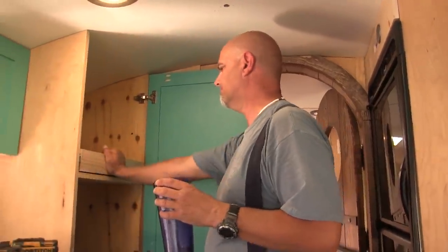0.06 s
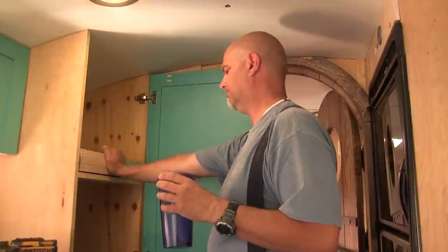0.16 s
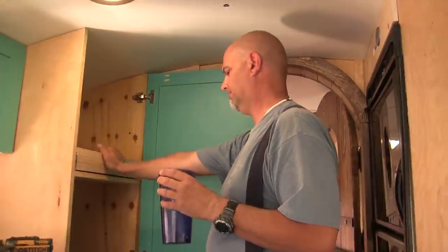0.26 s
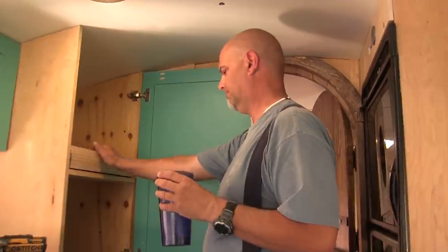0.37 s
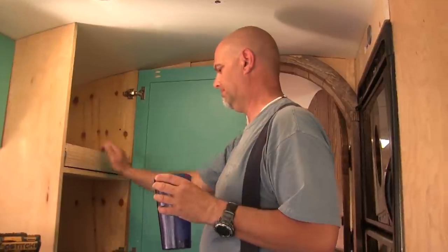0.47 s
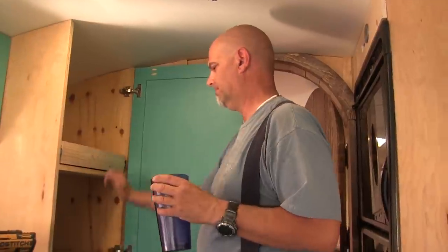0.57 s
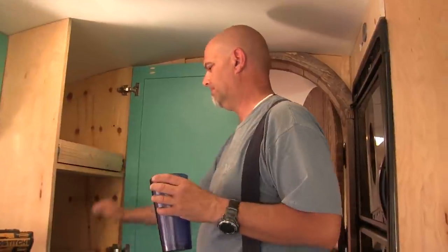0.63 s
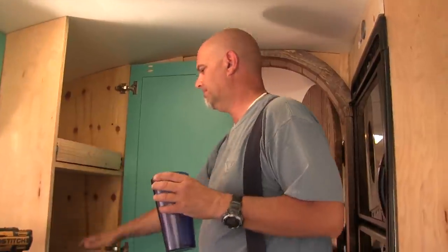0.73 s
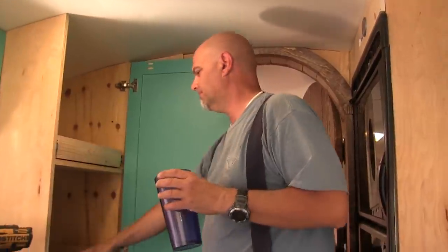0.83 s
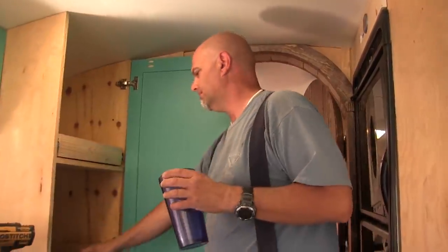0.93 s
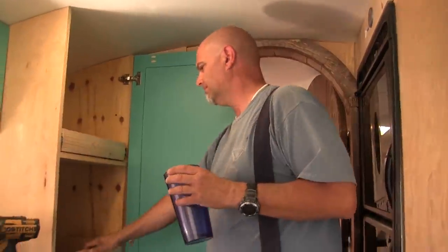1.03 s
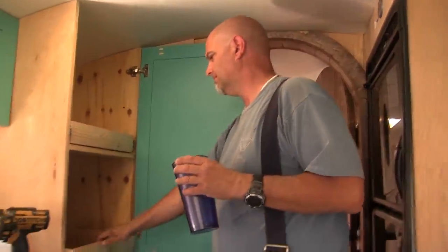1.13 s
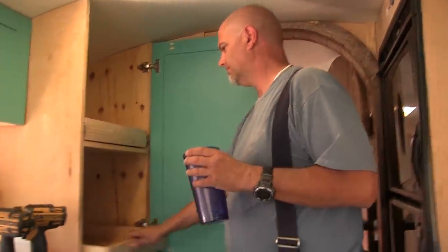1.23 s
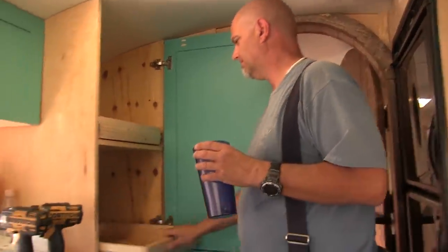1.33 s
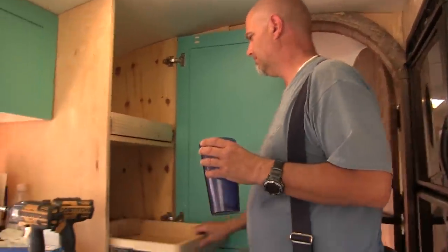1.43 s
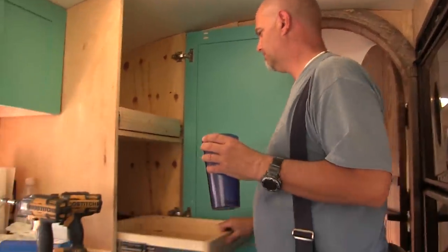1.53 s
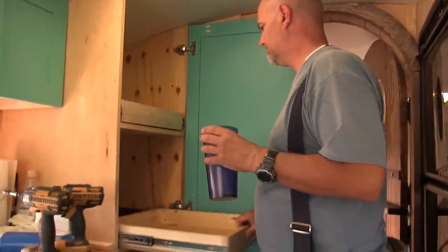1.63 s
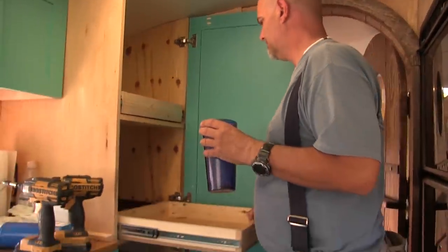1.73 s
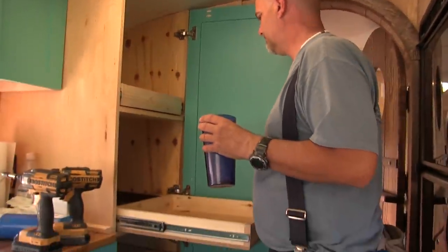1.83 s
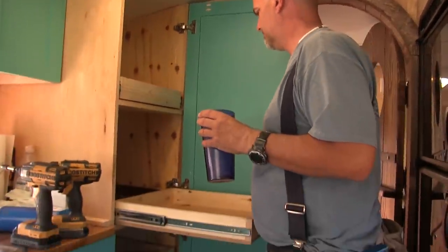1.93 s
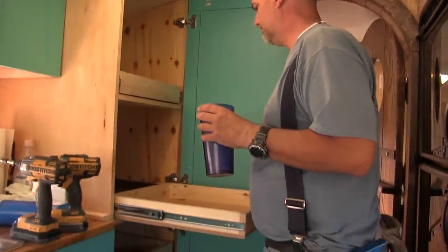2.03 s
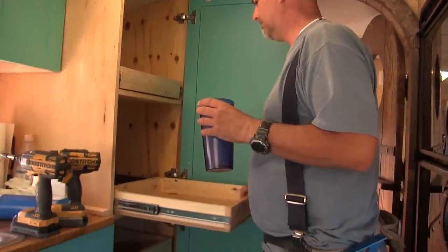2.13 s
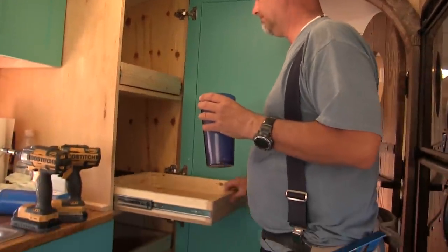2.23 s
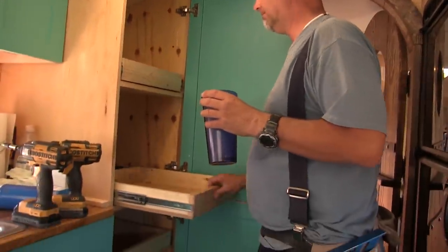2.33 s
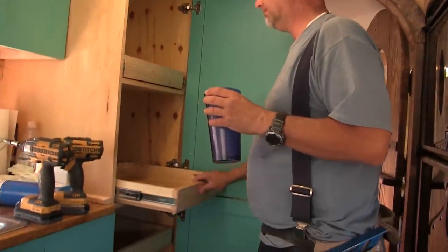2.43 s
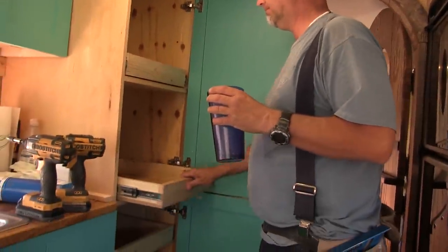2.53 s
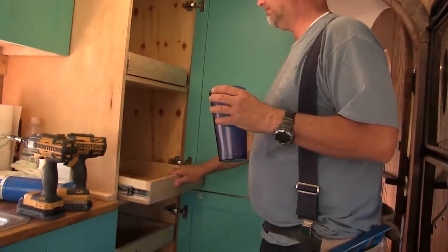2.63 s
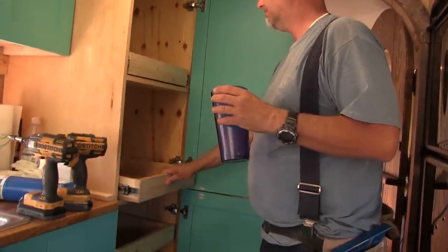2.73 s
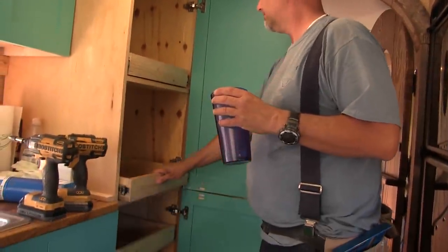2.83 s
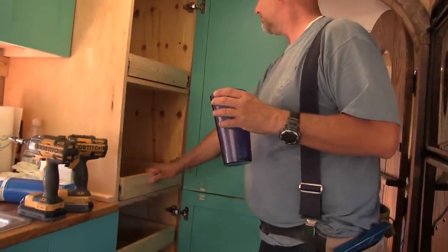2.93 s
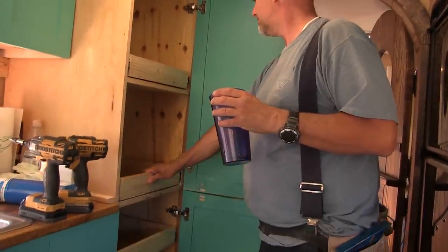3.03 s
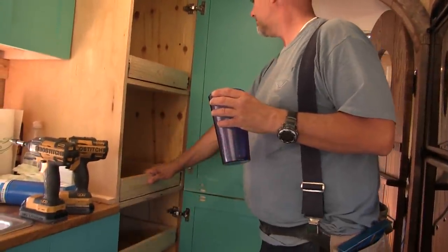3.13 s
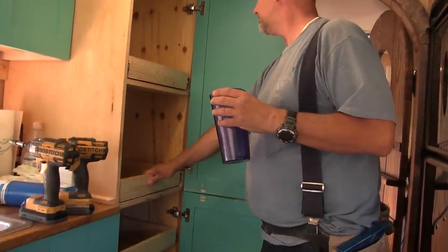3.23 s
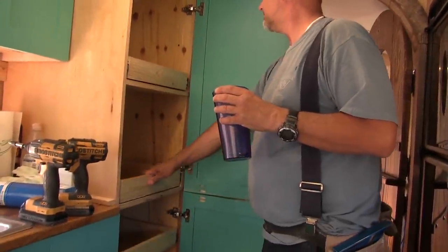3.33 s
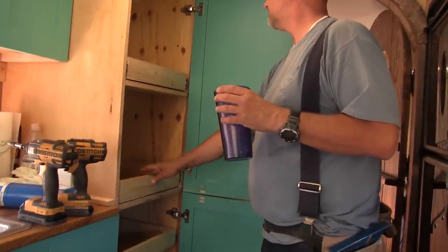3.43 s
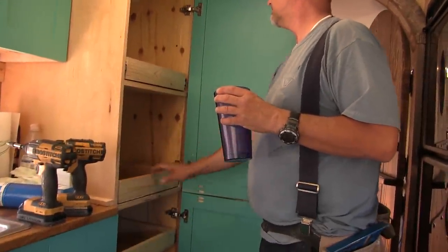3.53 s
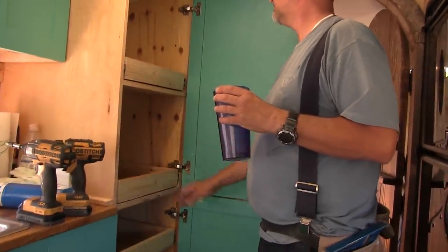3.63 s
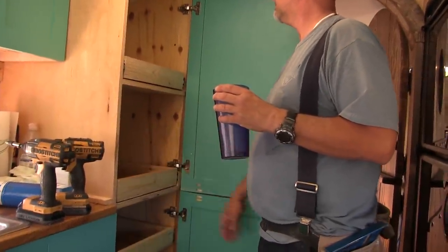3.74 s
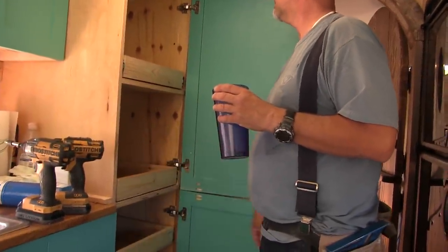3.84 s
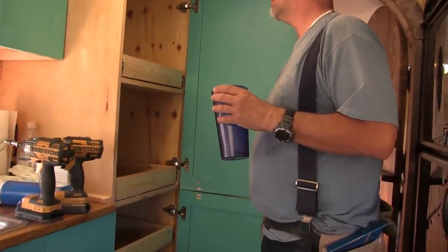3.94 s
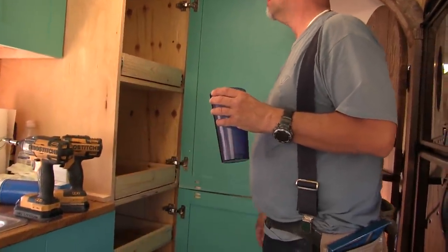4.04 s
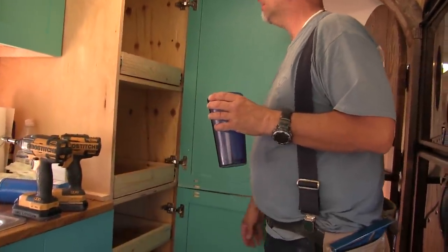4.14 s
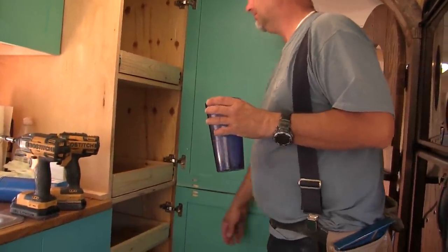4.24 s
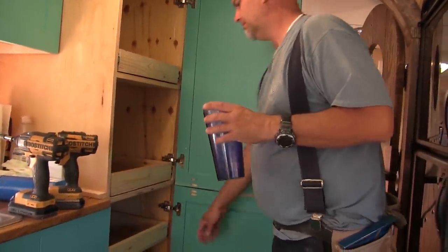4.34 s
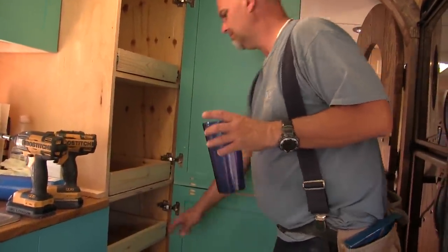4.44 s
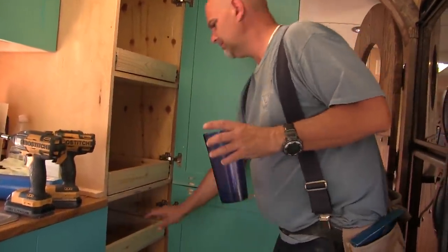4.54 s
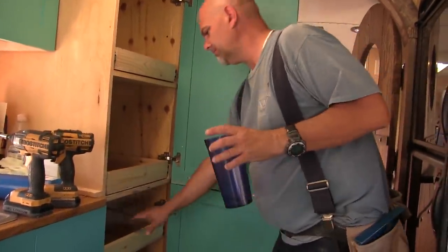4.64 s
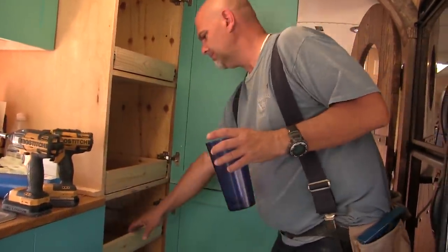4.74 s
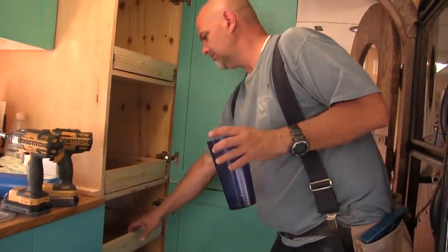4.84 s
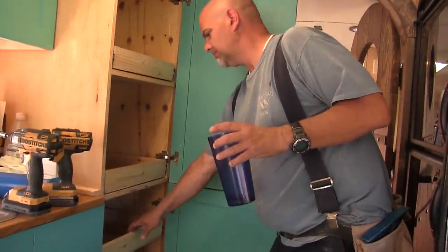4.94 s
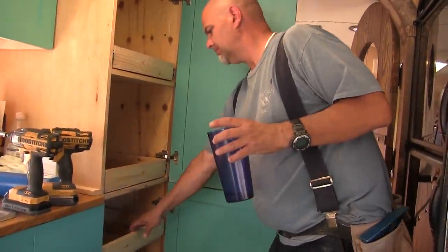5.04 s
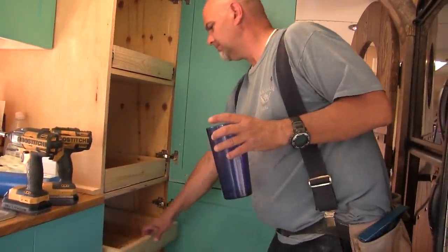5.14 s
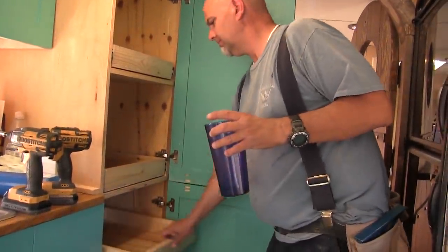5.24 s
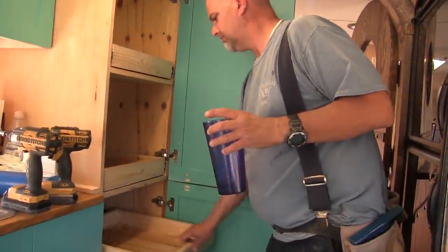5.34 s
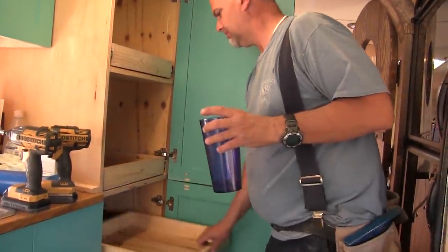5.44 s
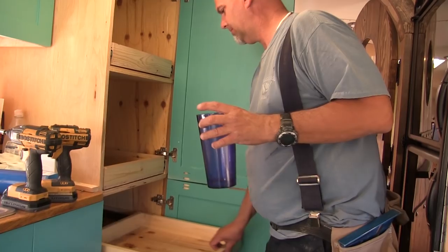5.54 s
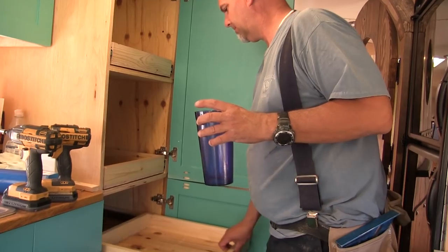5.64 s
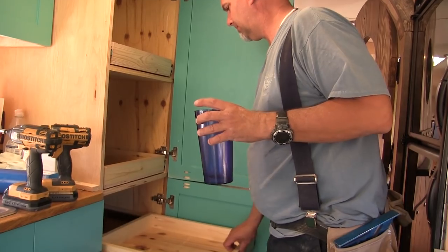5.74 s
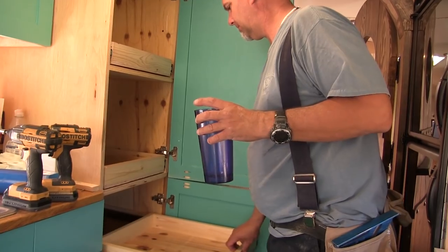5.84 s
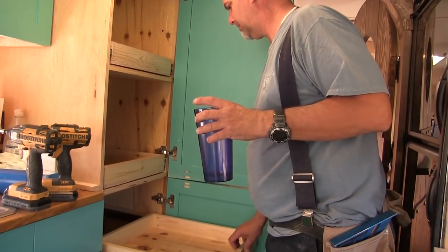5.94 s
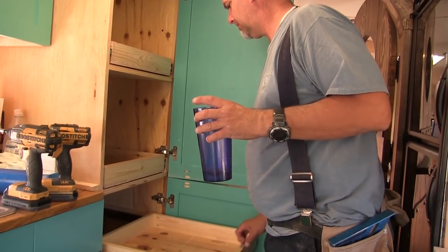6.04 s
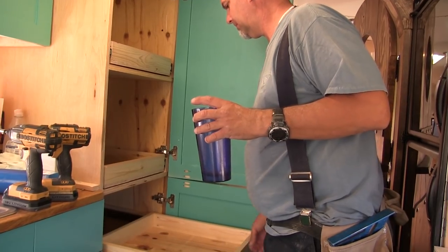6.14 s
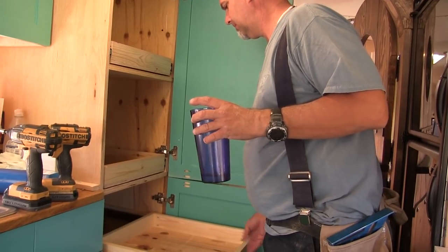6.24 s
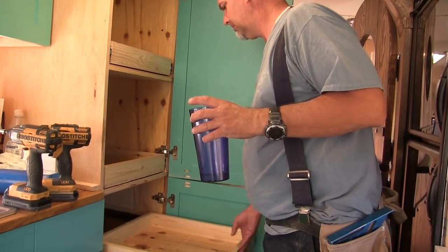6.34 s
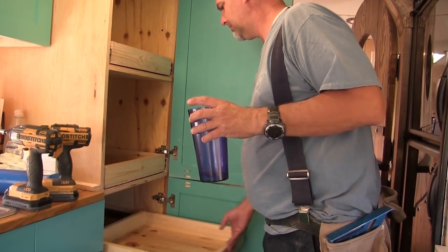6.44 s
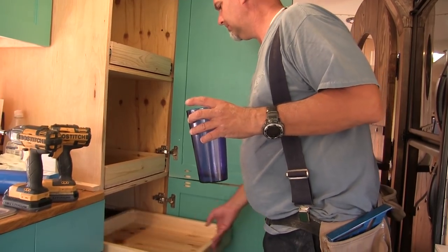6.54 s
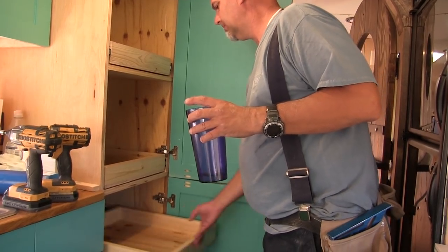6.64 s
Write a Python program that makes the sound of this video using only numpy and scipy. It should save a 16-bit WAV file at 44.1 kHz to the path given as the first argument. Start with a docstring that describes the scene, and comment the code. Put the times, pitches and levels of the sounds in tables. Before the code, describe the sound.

Close, slightly dull camera pickup in a compact wooden kitchen. Wooden pull-out shelves travel on ball-bearing rails: gritty rolling, boxy resonance and bright steel clicks at catches and stops. One goes out and in, ending in a cluster of knocks; after a near-quiet gap with floor thuds, another comes out more forcefully, gets a light hand brush and tap, then starts back in as the sound ends.

```python
"""Room rumble and hiss come first, with a catch click and a floor thud; then more clicks and a finger brush.
From about one second plywood pantry shelves roll out and in on steel ball slides in a small kitchen.
Random jolts, contact bursts and fine grit excite the modes of shelf, bottom panel, rail and wooden front;
shifting feet are decaying sines. A diffuse echo tail follows all but the floor thuds and noise."""
import sys
import numpy as np
from scipy import signal
from scipy.fft import rfft, irfft
from scipy.io import wavfile
from scipy.ndimage import uniform_filter1d

SR = 44100
rng = np.random.default_rng(int(sys.argv[2]) if len(sys.argv) > 2 else 0)


def unload_audio(sound):
    """Save the sound as a 16-bit wav file, at the path given as the first command line argument."""
    columns = np.transpose(np.atleast_2d(sound))
    # keep every value between -1 and 1, then stretch to whole-number steps
    steps = np.round(np.clip(columns, -1, 1) * 32767)
    wavfile.write(sys.argv[1], SR, steps.astype(np.int16))


N = 294720
T = np.arange(N) / SR


def undb(db):
    """Level definition: amplitude ratio of a level in dB."""
    return np.exp(np.asarray(db) * np.log(10) / 20)


def unit(x):
    """Normalisation to unit rms."""
    return x / np.sqrt(np.mean(x ** 2))


def walk(rate):
    """Low-pass random fluctuation: values held about 1 / rate s, smoothed twice; spread near 1."""
    hold_ms = int(1000 / rate)
    held = np.repeat(rng.standard_normal(N * 1000 // SR // hold_ms + 2), hold_ms)
    smooth = uniform_filter1d(uniform_filter1d(held, hold_ms), hold_ms)
    return 1.21 * np.interp(T * 1000, np.arange(len(smooth)), smooth)


MODE_FALL_DB = 12  # weakening of a mode one octave from the favoured frequency


def ring(x, modes, drift_db=0., rate=6, near_hz=None):
    """Modal superposition: parallel resonances, scaled so that steady modes keep the level of white noise.

    Each mode may drift on its own; near_hz is a moving frequency that favours the modes around it."""
    out, power = 0, 0
    for k, (hz, width, db) in enumerate(modes):
        b, a = signal.iirpeak(hz, hz / width, fs=SR)
        drive = x
        if near_hz is not None:
            drive = x * undb(-MODE_FALL_DB * np.log2(hz / near_hz) ** 2)
        gain = undb(db + drift_db * walk(rate))
        out = out + (-1) ** k * gain * signal.lfilter(b, a, drive)  # alternating sign
        power += undb(2 * db) * np.pi * width / SR
    return out / np.sqrt(power)


def soften(x, hz):
    """Finite contact time: a contact that lasts a while pushes little above hz."""
    return signal.lfilter(*signal.butter(2, min(hz, SR / 3), fs=SR), x)


def favour(x, hz, q):
    """Point excitation: the spot that is struck drives the modes near hz hardest."""
    return signal.lfilter(*signal.iirpeak(hz, q, fs=SR), x)


def bumps(rate, scatter_db):
    """Random impulse train: jolts of power-law size, rate per second on average, unit rms."""
    when, size, sign = rng.random((3, N))
    heights = undb(-scatter_db * np.log(size + 1e-9))
    return unit((when < rate / SR) * heights * np.sign(sign - .5))


def rattle(ms, rise_ms):
    """Noise burst: contacts that gather, chatter for a moment, then die quickly."""
    t_ms = np.arange(SR // 8) * 1000 / SR
    fall = np.exp(-(t_ms / max(ms, 1)) ** 1.57)
    return rng.standard_normal(len(t_ms)) * fall * np.minimum(t_ms / max(rise_ms, .2), 1)


def coloured(points):
    """Spectral shaping: white noise weighted to a given spectrum, unit rms."""
    hz, db = np.transpose(points)
    f = np.maximum(np.arange(N // 2 + 1) * SR / N, 1)
    weights = undb(np.interp(np.log(f), np.log(hz), db))
    return unit(irfft(rfft(rng.standard_normal(N)) * weights, N))


# spectrum common to both ports: f/Hz, relative density level/dB
SHARED_NOISE = [(12, -58), (20, -11), (91, -11.5), (198, -20), (255, -22.5), (422, -25), (590, -25.5),
                (780, -26.5), (1190, -28), (1710, -30), (2080, -29.5), (5000, -34), (10800, -37),
                (16000, -39.5)]
SHARED_NOISE_DB = -52.7


def shared_noise():
    """Stationary coherent noise: the rumble and hiss alike at both ports."""
    return undb(SHARED_NOISE_DB) * coloured(SHARED_NOISE)


# spectrum of the noise opposite in the two ports: f/Hz, relative density level/dB
OPPOSED_NOISE = [(12, -39), (20, 9), (74, -5), (138, -9), (241, -15.5), (301, -13), (923, -20), (4670, -14),
                 (16000, -14.5)]
OPPOSED_NOISE_DB = -59


def opposed_noise():
    """Stationary antiphase noise: added at one port, subtracted at the other."""
    return undb(OPPOSED_NOISE_DB) * coloured(OPPOSED_NOISE)


# modes of bottom panel, shelf, steel rail and bare contact tick: f/Hz, width/Hz, relative level/dB
PANEL = [(114.8, 15.7, -3), (144, 52.6, -3), (213.8, 68, 0), (249.2, 20, -5)]
SHELF = [(304, 116, -7), (372, 56, 1), (428, 33, 1), (478, 35.4, 3.5), (530, 73, -2), (620, 79, 0),
         (642, 383, -5.5), (770, 120, -9.5), (884.5, 40, 1), (937, 374, 0), (1074, 233, 1.5),
         (1320, 3500, -11.5)]
RAIL = [(1534, 420, 5), (2053, 130, 5.5), (2570, 990, 1), (3560, 216, 2), (3650, 580, -6), (4900, 170, 1),
        (4970, 1800, -3.5), (8500, 6500, -10.5)]
TICK = [(6700, 1800, -5), (10600, 21000, -18), (15100, 7400, -2)]
# catches, stops and knocks: t/s, shelf level/dB, panel thud level/dB, rail level/dB, tick level/dB
# (drives, before the gain of each part), rattle decay/ms, favoured shelf f/Hz, favoured rail f/Hz
HITS = [(0.0, -42.5, -39, -43, -50, 10, 696, 1780), (0.311, -50, -44.5, -47, -70, 5.1, 1090, 1460),
        (0.919, -29, -36, -31, -45, 8.5, 804, 2600), (0.923, -49, -48, -29, -32, 2, 900, 3970),
        (0.93, -31.5, -38, -37, -60, 13, 480, 1500), (0.989, -39.5, -47, -42.5, -53, 12, 900, 5540),
        (0.996, -31.5, -42, -39.5, -56, 10.4, 950, 2080), (1.012, -43, -39.5, -54, -65, 20.6, 520, 1600),
        (1.178, -57, -53, -44.5, -52, 19, 560, 2580), (1.803, -32, -35, -16, -24, 1.9, 460, 3940),
        (1.803, -28, -41, -20, -23, 8.3, 463, 3540), (1.816, -47, -45, -40, -44, 25, 900, 3860),
        (1.89, -38, -44, -18, -33, 2.4, 890, 2410), (1.892, -45, -38, -46, -43, 19, 900, 2760),
        (1.88, -24.5, -30, -18.5, -27, 9.1, 1070, 2500), (2.119, -38.5, -52, -48.5, -53, 18, 342, 1610),
        (2.961, -38, -38, -38.5, -29, 9.9, 875, 2940), (2.969, -31, -43, -42, -50, 8.94, 910, 1600),
        (2.983, -35, -39, -30.5, -49, 9.3, 500, 4650), (2.988, -43, -36, -25, -36, 6.6, 1010, 1500),
        (3.024, -31, -26, -41, -55, 8.1, 895, 1500), (3.036, -27, -39, -27, -37, 7.9, 392, 2470),
        (3.116, -35, -37.5, -34, -40, 11.7, 390, 1470), (3.132, -30.5, -27, -30, -44, 13.5, 566, 1600),
        (4.804, -40.5, -30.5, -44, -76, 18.7, 404, 1550), (4.9, -43.5, -58, -44, -70, 30, 607, 1850),
        (4.937, -41, -46, -34.5, -40, 7.3, 1000, 3760), (5.12, -41, -28.5, -33.5, -42, 11.5, 514, 1560),
        (5.218, -16, -20, -21, -48, 8.6, 614, 2140), (5.279, -41, -33, -29, -61, 8.2, 417, 1630),
        (5.387, -20.5, -18, -24.5, -59, 13, 527, 1280), (5.445, -35, -35, -34, -37.5, 15, 530, 4340),
        (6.292, -73, -69, -46, -83, 3, 501, 2500), (6.335, -45, -46, -47, -85, 17, 530, 2580)]
RISE_SHARE, WOOD_RISE_SHARE = 0.25, 0.416  # rise per decay time; wood takes the blow later than steel
SHELF_Q, RAIL_Q = 1.25, 0.8


def hits():
    """Impact excitation: each blow is a short rattle of contacts shared by shelf, panel, rail and tick."""
    push = np.zeros((4, N))
    for s, *db, ms, shelf_hz, rail_hz in HITS:
        start = int(s * SR)
        chatter = rattle(ms, RISE_SHARE * ms)
        # once the contacts have gathered the wood feels one firm shove
        shove = 0.89 * rattle(ms, WOOD_RISE_SHARE * ms)
        shove[int(max(WOOD_RISE_SHARE * ms, .2) * SR / 1000)] += 3.5
        shelf = favour(shove, shelf_hz, SHELF_Q)
        rail = favour(favour(chatter, rail_hz, RAIL_Q), rail_hz, RAIL_Q)
        shares = undb(db)[:, None] * np.array([shelf, shove, rail, chatter])
        push[:, start:start + len(shove)] += shares[:, :N - start]
    rings = 0
    # modes, gain/dB, contact soft above f/Hz
    parts = [(SHELF, 16.5, 3040), (PANEL, 6.5, 620), (RAIL, 1.5, 7160), (TICK, -4.0, 14000)]
    for drive, (modes, gain_db, soft_hz) in zip(push, parts):
        rings = rings + undb(gain_db) * soften(ring(drive, modes, drift_db=2.0, rate=12), soft_hz)
    # the crack of steel on steel is also heard bare
    return rings + undb(7.0) * soften(push[2], 5400)


# feet shifting on the floor: t/s, level/dB, f/Hz
STEPS = [(0.009, -34, 62.7), (0.307, -43, 95.4), (0.549, -44, 78), (0.7, -45, 83), (2.056, -41.5, 72),
         (3.05, -43, 127), (3.149, -33.5, 78), (3.248, -41, 82), (3.619, -43.5, 69), (3.773, -45, 80),
         (3.968, -39.5, 82), (4.504, -44, 85), (4.699, -43.5, 87), (4.814, -33.5, 119),
         (5.499, -29.5, 79.5)]
STEP_RISE_S, STEP_T60_S = 0.0038, 0.41


def steps():
    """Damped free vibration: each thump of the floor boards is one low, exponentially decaying sine."""
    out, t = np.zeros(N + SR), T[:SR]
    envelope = np.exp(-np.log(1000) * t / STEP_T60_S) * np.minimum(t / STEP_RISE_S, 1)
    for s, db, hz in STEPS:
        start = int(s * SR)
        out[start:start + SR] += undb(db) * np.sin(2 * np.pi * hz * t) * envelope
    return out[:N]


# modes of a shelf front before the factors of each touch: f/Hz, width/Hz, relative level/dB
FRONT = [(598, 15, 11), (695, 53, 0), (912, 48, -1), (1076, 77, -2.5), (1276, 36, -1.5), (1600, 72, -6.5),
         (1750, 1430, -14.5), (2196, 38, -1), (2490, 51, -5), (2940, 85, -10), (3870, 89, -3),
         (4920, 200, -8), (6500, 770, -13.5)]
# fingers brushing a front: start t/s, end t/s, drive level/dB, contact soft above f/Hz,
# pitch factor on FRONT, added level of lowest mode (held by the hand)/dB, width factor (resting fingers)
BRUSHES = [(0.725, 0.92, -53, 5030, 0.89, -10, 9), (3.31, 3.35, -57.5, 4500, 0.96, -15, 3),
           (3.422, 3.458, -45, 3600, 0.91, 0.5, 3), (6.044, 6.119, -43.5, 8000, 0.97, 1, 2.4)]
BRUSH_RISE_DB_PER_S, BRUSH_FALL_DB_PER_S = 350, 302


def brushes():
    """Frictional excitation: skin slips over the grain in fine dense grit and rings a shelf front."""
    grit, out = bumps(12000, 2.1), 0
    for start, end, db, soft_hz, pitch, lowest_db, damping in BRUSHES:
        before_db = BRUSH_RISE_DB_PER_S * np.maximum(start - T, 0)
        after_db = BRUSH_FALL_DB_PER_S * np.maximum(T - end, 0)
        push = soften(grit * undb(db - before_db - after_db), soft_hz)
        modes = [(hz * pitch, width * damping, mode_db + lowest_db * (k == 0))
                 for k, (hz, width, mode_db) in enumerate(FRONT)]
        out = out + ring(push, modes, drift_db=5.5, rate=11.0)
    return out


# one list per travel of a shelf: t/s, rolling drive level/dB (before the gain of each part),
# brightness level/dB, favoured shelf f/Hz
TRAVELS = [
    [(1.17, -51, 9, 500), (1.235, -33.5, 1, 490), (1.36, -29, -2.5, 497), (1.48, -26, -5.5, 540),
     (1.6, -29, -4, 516), (1.67, -23.5, -9.5, 414), (1.77, -33, -6, 440), (1.92, -36.5, -4, 400),
     (2.06, -80, 1, 320)],
    [(2.06, -70, 15.5, 320), (2.15, -35, -9.5, 377), (2.3, -28, -5, 420), (2.5, -29, -5.5, 458),
     (2.6, -29, -6, 490), (2.65, -33.5, -4, 420), (2.79, -38.5, 0, 380), (2.95, -45.5, 7, 347),
     (3.12, -53, 8, 400)],
    [(5.1, -63, 12, 450), (5.14, -33, 1.5, 450), (5.2, -22.5, -4.5, 525), (5.3, -30, 2.5, 574),
     (5.41, -21, -10, 460), (5.46, -27.5, 0.5, 563), (5.54, -24, -4.5, 580), (5.64, -27.5, -5, 484),
     (5.77, -40, 0, 393), (5.85, -48, -3, 332), (6.0, -77.5, 18, 300)],
    [(6.36, -60, 7.5, 400), (6.45, -35.5, -1.5, 473), (6.54, -27, -6, 455), (6.6, -27, -3.5, 547),
     (6.68, -25.5, -2.5, 490)],
]
# one value per travel: bottom panel drive level against the shelf/dB, at full speed
LOADS = [-7, -4, -6.5, -3.5]
FULL_SPEED_DB, PANEL_PER_LEVEL = -24, -0.47  # the panel sinks less than the shelf as the travel slows
RAIL_DB, UPPER_DB, UPPER_PER_BRIGHT = -12, -7, 1.33  # drives against the shelf; dB per dB of brightness


def rolling():
    """Roughness excitation: balls jolt over the rails; as the support moves, shelf modes trade strength."""
    spans = [(T >= rows[0][0]) & (T < rows[-1][0]) for rows in TRAVELS]
    moving = sum(spans)
    rows = np.concatenate(TRAVELS)
    level_db, bright_db, near_hz = [np.interp(T, rows[:, 0], rows[:, k]) for k in (1, 2, 3)]
    level = uniform_filter1d(moving * undb(level_db), size=256)
    jolts = bumps(900, 1.67) * undb(1.37 * walk(14)) * level

    lower = ring(jolts, SHELF[:7], drift_db=2.0, rate=9, near_hz=near_hz)
    lower = undb(2.5) * soften(lower, 1010)
    # harder jolts reach the upper modes too
    upper_drive = jolts * undb(UPPER_DB + UPPER_PER_BRIGHT * bright_db)
    upper = soften(ring(upper_drive, SHELF[7:], drift_db=2.5, rate=10), 2500)

    panel_db = sum(span * db for span, db in zip(spans, LOADS))
    panel_db = panel_db + PANEL_PER_LEVEL * (level_db - FULL_SPEED_DB)
    panel = soften(ring(jolts * undb(panel_db), PANEL, drift_db=0.5, rate=7.6), 620)

    grit = bumps(3000, 2.0) * undb(2.2 * walk(30) + RAIL_DB + bright_db) * level
    # rolling contact is softer than a blow, so it tilts the rail towards its low modes
    grit = signal.lfilter(*signal.butter(1, 1300, fs=SR), grit)
    rail = soften(soften(ring(grit, RAIL), 10000), 10000)

    # balls drop into dents about 200 times a second: many small pushes, all the same way
    dents = favour(soften(np.abs(bumps(200, 0.61)) * level, 1110), 700, 0.9)
    return undb(8.5) * dents + undb(5.0) * (lower + upper) + undb(1.5) * panel + undb(10.5) * rail


# blunt knocks on a front: t/s, peak level/dB, rattle decay/ms, contact soft above f/Hz,
# pitch factor on FRONT, width factor on FRONT, added level of all but the lowest mode/dB
TAPS = [(3.131, -11.5, 5, 910, 0.94, 3.5, -8.5), (6.104, -23.5, 13, 3050, 1.01, 2.7, 1),
        (6.334, -42, 3.94, 2500, 1.01, 2.3, -6)]
TAP_RISE_SHARE, TAP_SHOVE = 0.4, 9.3  # rise per decay time; shove height against the chatter


def taps():
    """Impulse response of a plate: one firm push amid a little chatter sets the whole front ringing."""
    out = np.zeros(N + SR)
    for s, db, ms, soft_hz, pitch, damping, upper_db in TAPS:
        push = rattle(ms, TAP_RISE_SHARE * ms)
        push[int(TAP_RISE_SHARE * ms * SR / 1000)] += TAP_SHOVE
        push = soften(np.pad(push, (0, SR // 4)), soft_hz)
        rung = 0
        for k, (hz, width, mode_db) in enumerate(FRONT):
            mode_hz, q = hz * pitch, hz / width / damping
            # the blow spreads through the board, so each mode swells in before it fades
            mode = favour(favour(push, mode_hz, q), mode_hz, q)
            rung = rung + undb(mode_db + upper_db * (k > 0)) * mode
        start = int(s * SR)
        out[start:start + len(push)] += undb(db) * rung / np.max(np.abs(rung))
    return out[:N]


ROOM_T60_S, ROOM_DAMP_HZ, ROOM_DB, TAP_ROOM_DB = 0.27, 3320, -6, -8.5


def echoes(x):
    """Diffuse reverberation: close walls and cupboards give a dense short tail whose treble dies first."""
    t = np.arange(SR // 4) / SR
    noise = rng.standard_normal(len(t)) * np.minimum(t / 0.0056, 1)
    dull = signal.lfilter(*signal.butter(1, ROOM_DAMP_HZ, fs=SR), noise)
    fall = np.exp(-np.log(1000) * t / ROOM_T60_S)
    tail = dull * fall + (noise - dull) * fall ** 1.97
    return signal.oaconvolve(x, tail / np.sqrt(np.sum(tail ** 2)))[:N]


def room(x):
    """Time-varying reverberation: as shelves and body move, sound passes between two echo patterns."""
    place = 3.64 * walk(12)  # radians
    return x + undb(ROOM_DB) * (echoes(x * np.cos(place)) + echoes(x * np.sin(place)))


def scene():
    """Superposition: all sources reach both ports alike; only the opposed noise differs."""
    knocks = taps()
    near = room(hits() + brushes() + rolling()) + knocks + undb(TAP_ROOM_DB) * echoes(knocks)
    mid = near + steps() + shared_noise()
    side = opposed_noise()
    return np.array([mid + side, mid - side])


TOP_HZ = 15780


def record(dry):
    """Band limitation: the camera cuts the top with a steep elliptic low-pass."""
    return signal.sosfilt(signal.ellip(10, .2, 70, TOP_HZ, fs=SR, output="sos"), dry)


dry = scene()
out = record(dry)
unload_audio(out)
```